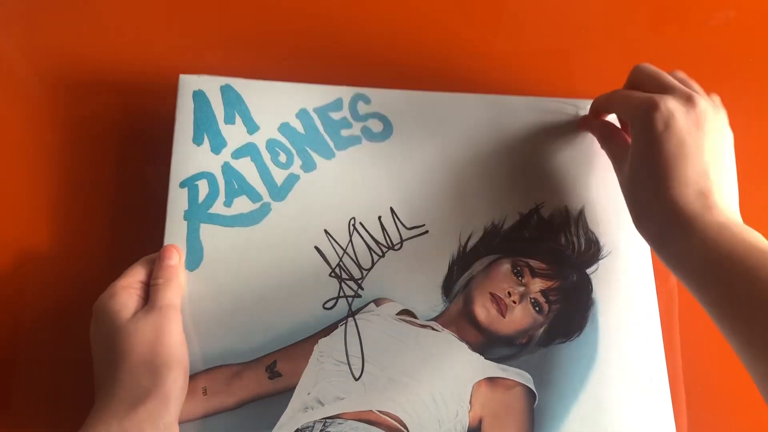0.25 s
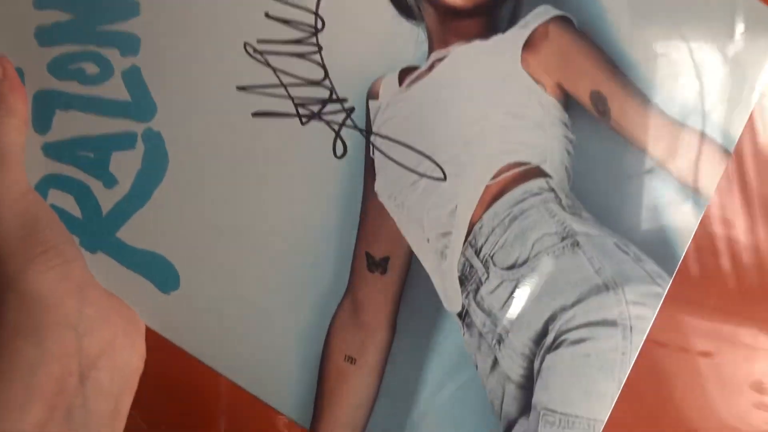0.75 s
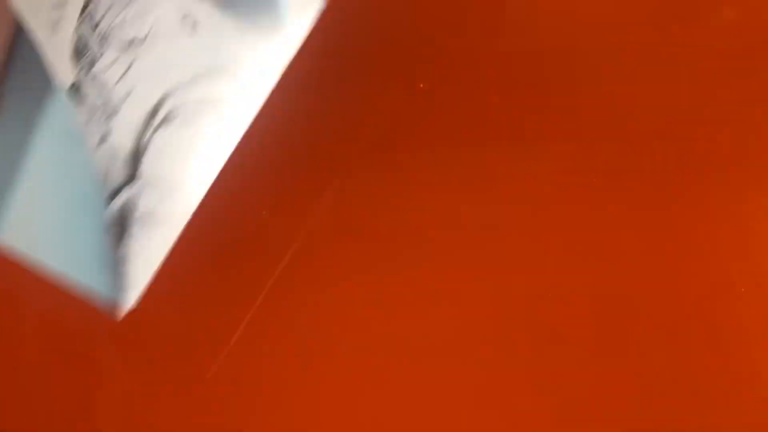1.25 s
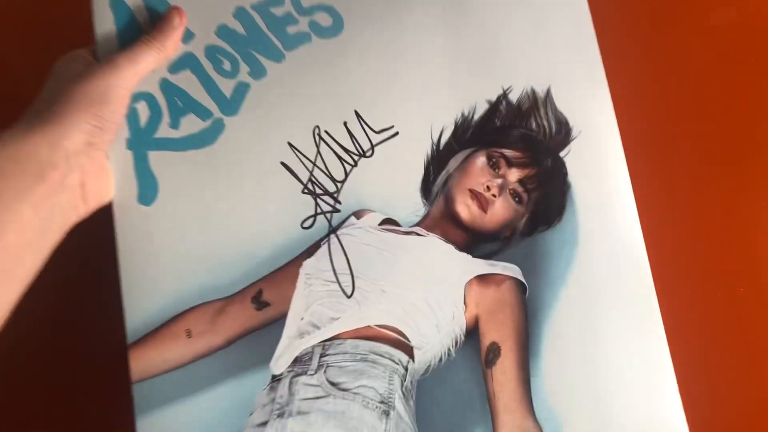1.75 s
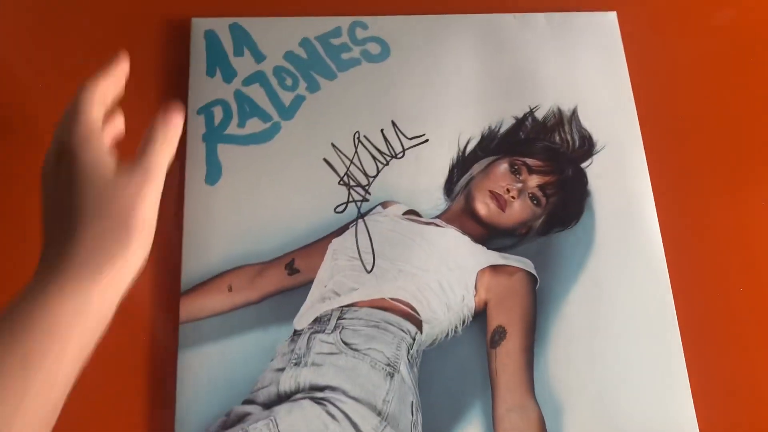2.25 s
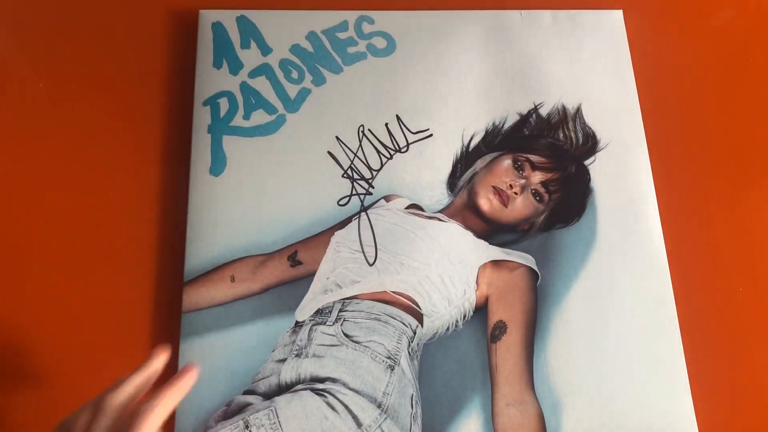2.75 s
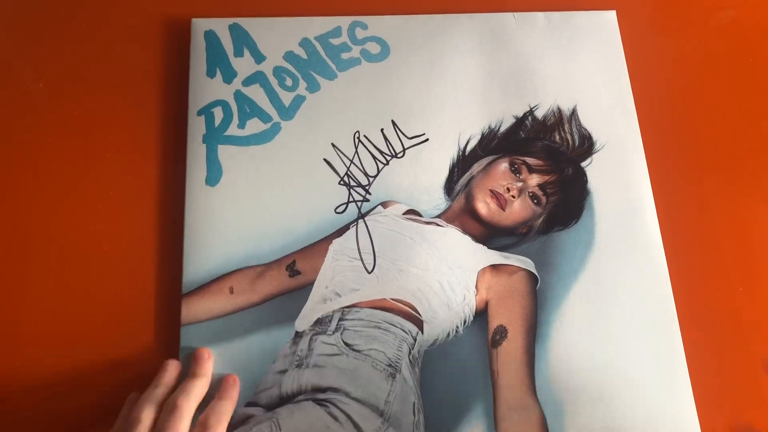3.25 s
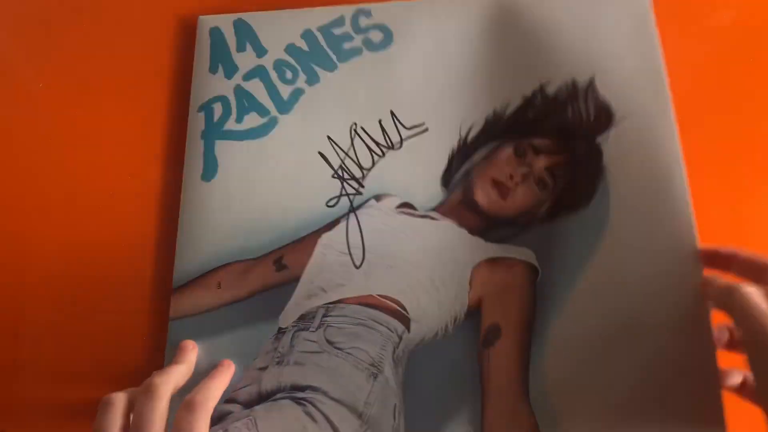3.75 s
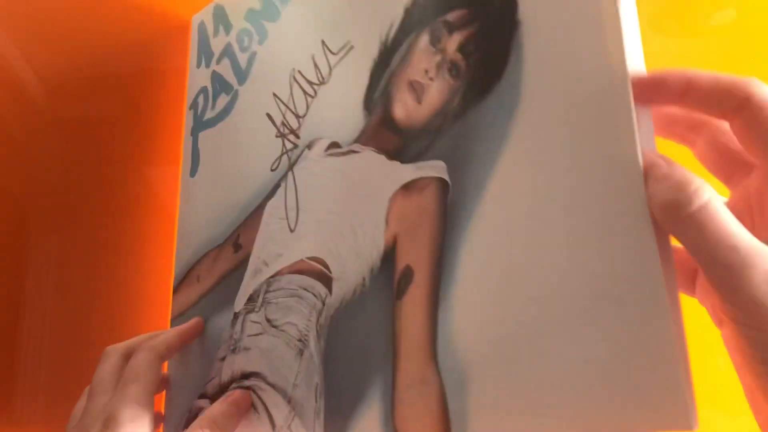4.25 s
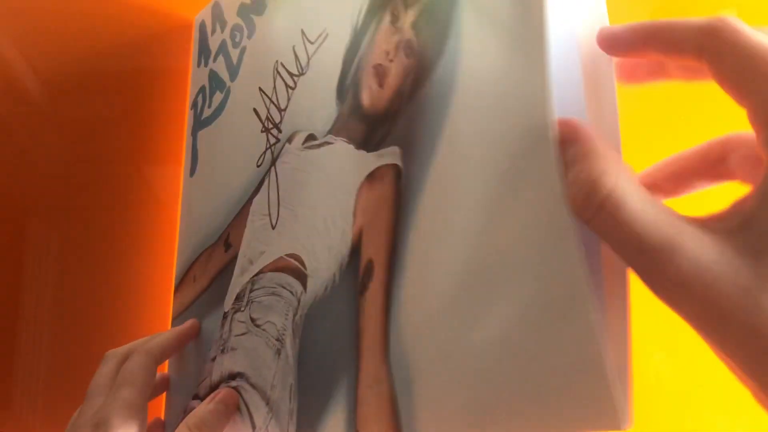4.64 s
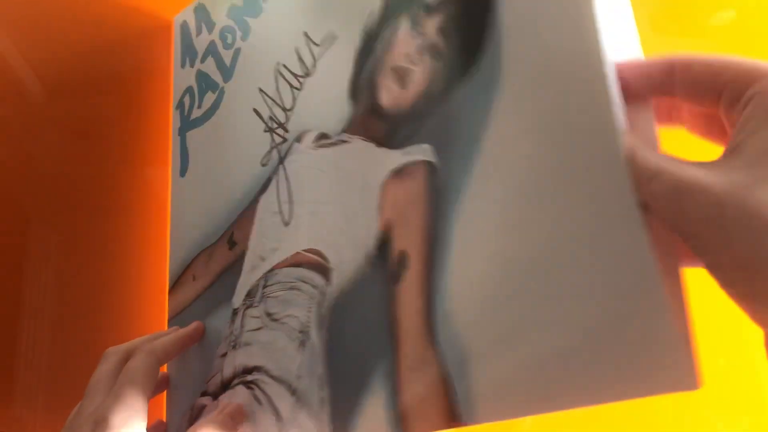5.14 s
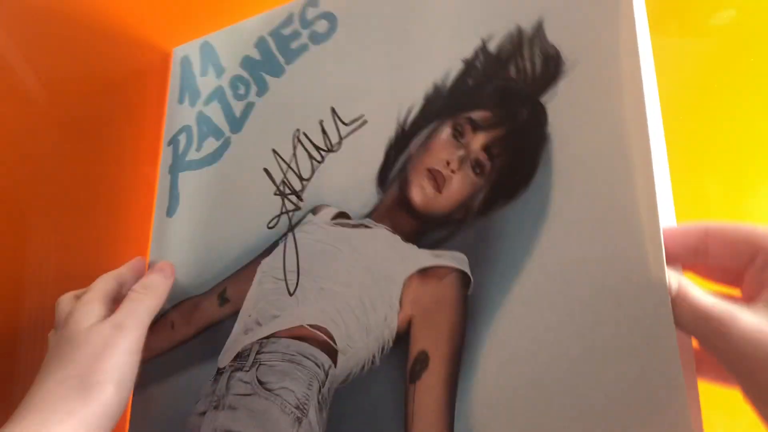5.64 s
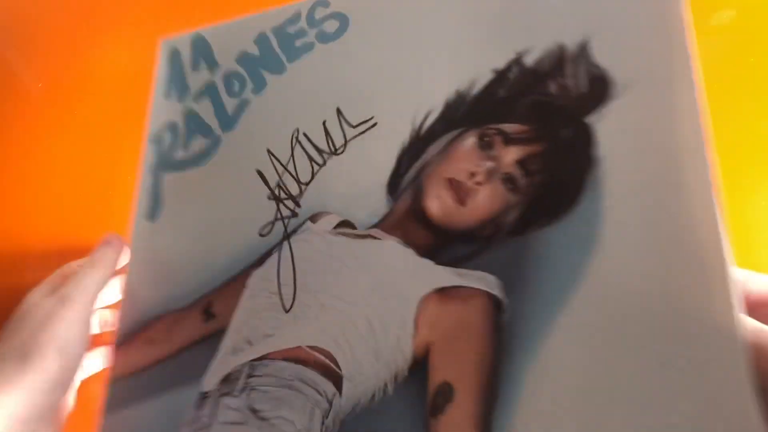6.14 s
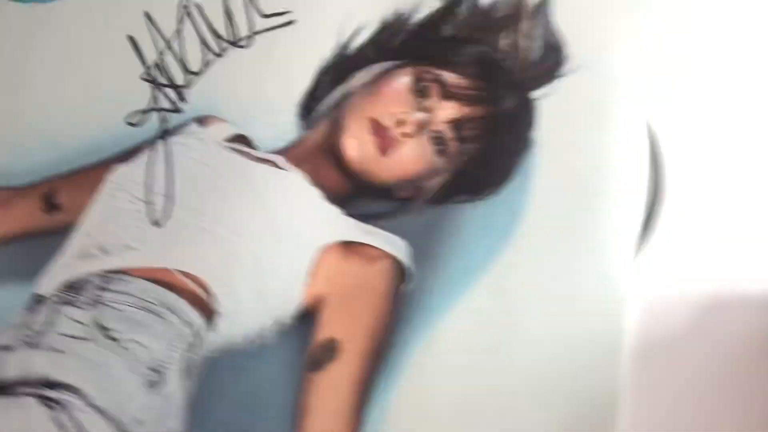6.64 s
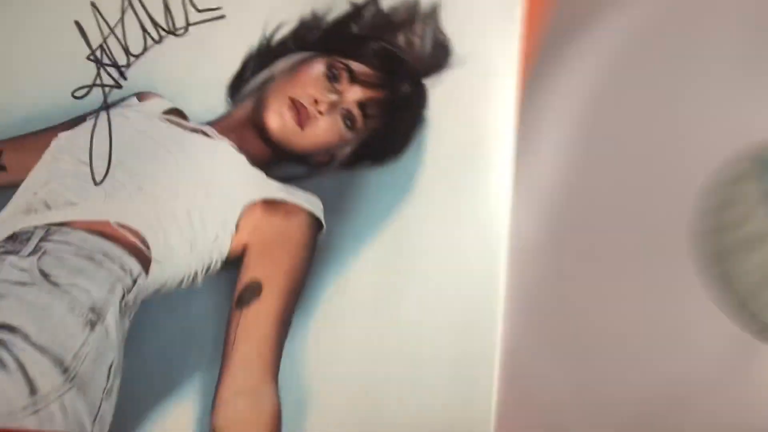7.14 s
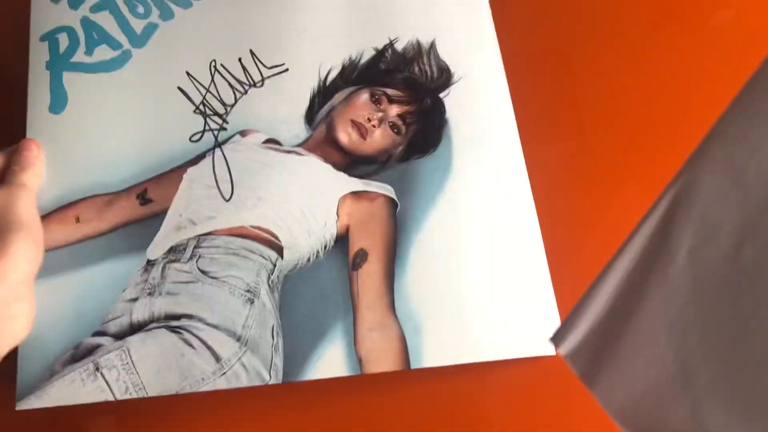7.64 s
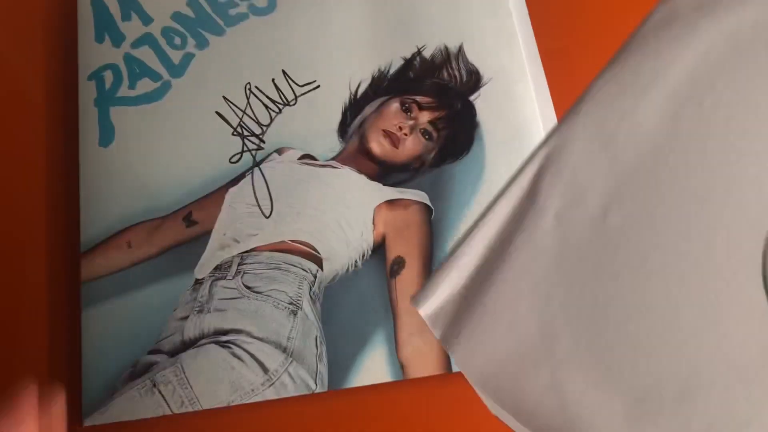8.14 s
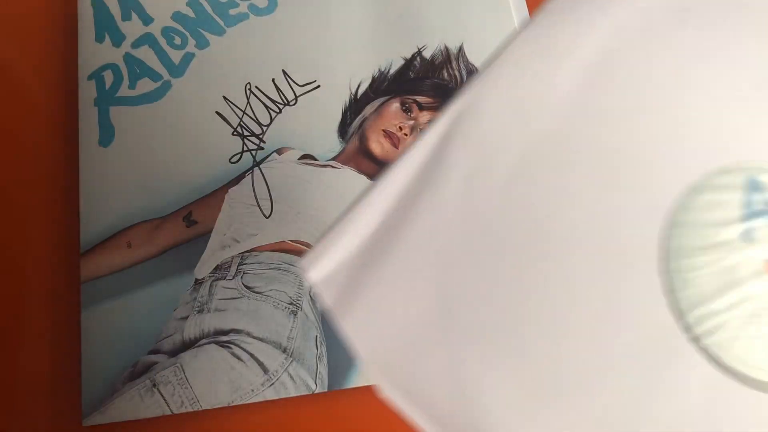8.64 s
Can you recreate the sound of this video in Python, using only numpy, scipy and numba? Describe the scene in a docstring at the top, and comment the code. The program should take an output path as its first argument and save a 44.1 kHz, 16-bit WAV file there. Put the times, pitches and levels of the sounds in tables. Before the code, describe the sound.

Hands peel thin plastic film from a card record sleeve with fine crackles and hiss, ending in one loud sharp snap. The card is laid down with light taps and soft table bumps, then pried open with dull rubs and creaks. A paper inner sleeve slides out in two breathy, rising swishes, followed by a few loose clicks. Close phone microphone, small quiet room.

```python
"""Unwrapping a card record sleeve

Hands strip plastic film from the sleeve on a wooden table, set it down, pry it open and draw the
paper inner sleeve out in two pulls. Rubbing is a dense spray of tiny slips; creases snap as short cracks;
card and table ring as dying modes; a small quiet room answers as fading noise, close under a phone."""
import sys
import numpy as np
from scipy import signal
from scipy.fft import rfft, irfft, next_fast_len
from scipy.io import wavfile
from scipy.ndimage import uniform_filter1d
from numba import njit

SR = 44100
rng = np.random.default_rng(int(sys.argv[2]) if len(sys.argv) > 2 else 0)


def wrap_up_sound(samples):
    """Save the sound to the file named by the first command line argument, as 16-bit audio."""
    columns = np.atleast_2d(samples).T
    # keep every value between -1 and 1, then stretch to whole-number steps
    tamed = np.clip(columns, -1, 1)
    steps = np.round(tamed * 32767).astype(np.int16)
    wavfile.write(sys.argv[1], SR, steps)


N = 392049

# still air and microphone hiss, relative spectrum: f/Hz, density/dB per Hz
AIR_SPECTRUM = [(15, -51), (25, -7), (127, -5), (190, -4), (223, -6), (405, -13), (1190, -21.5),
                (1840, -23.5), (16000, -37)]
# hand strokes over film and card: start/s, hold/s, rubbing level in 1-5 kHz before resonances/dB,
# slope/dB per octave (near 0 thin film, steep dull card), pitch of the bent sheet/Hz
HAND_STROKES = [(0.084, 0.067, -61, -3, 8100), (0.272, .59, -54, -1.5, 470),
                (0.876, 0.014, -41.5, -3.5, 1815), (.99, 0.26, -56.5, -3, 450),
                (1.438, 0.069, -60, -4, 1100), (1.561, 0.12, -63, -6.5, 576), (1.756, 0.061, -57, -5, 630),
                (1.892, 0.097, -56.5, -5.5, 810), (2.06, 0.13, -66, -1.5, 970),
                (2.222, 0.12, -64.5, -2, 1110), (2.38, 0.092, -64, -1.5, 1270),
                (2.854, 0.01, -61.5, -5.5, 935), (3.419, 0.15, -68, -5, 1043),
                (3.657, 0.13, -65.5, -6.5, 1350), (3.784, 0.028, -55.5, -8, 508),
                (4.08, 0.015, -55.5, -7, 1890), (4.171, 0.0097, -58, -7.5, 1800),
                (4.383, 0.0078, -67.5, -6, 1630), (4.59, 0.19, -65, -8, 1370), (4.849, 0.11, -62, -4, 2350),
                (4.949, 0.1, -59.5, -5, 1115), (5.137, 0.069, -59.5, -8.5, 1284),
                (5.3, 0.043, -58, -4.5, 446), (5.4, 0.038, -51.5, -9, 480), (5.612, 0.09, -51, -5.5, 512),
                (5.842, 0.062, -50.5, -7.5, 1150), (6.09, 0.095, -69, -10, 1540),
                (6.188, 0.094, -57, -7, 1045), (7.424, 0.06, -56.5, -4, 2890),
                (7.503, 0.0098, -48, -6.5, 785), (7.59, 0.12, -59, -8, 864), (7.7, .11, -66, -8, 832),
                (8.835, 0.047, -67, -1.5, 6850)]
# resonances of the card: f/Hz, relative level/dB, t60/s
CARD_MODES = [(381, 8, 0.045), (458, 4, 0.093), (515, 7.5, 0.038), (646, 0, 0.13), (810, -3.5, 0.056),
              (1394, -10, 0.48)]
# light ticks of film and paper that leave the card still: t/s, crack peak/dB, centre f/Hz
LIGHT_TICKS = [(0.1371, -28.5, 8750), (0.255, -44, 5000), (0.415, -35.5, 5740), (0.639, -37, 7500),
               (0.717, -37, 11000), (1.0187, -31, 6300), (1.0816, -36, 4100), (1.113, -32.5, 7600),
               (1.184, -35, 4140), (1.2075, -35.5, 3700), (1.597, -41, 2100), (1.659, -40, 2030),
               (1.767, -45, 2000), (2.077, -40, 6550), (2.2353, -33, 11060), (2.427, -39.5, 11000),
               (2.8598, -45, 1470), (2.88, -44, 780), (3.848, -42, 2680), (4.0932, -33, 2120),
               (4.196, -40.5, 2900), (4.339, -40.5, 1560), (5.41, -42, 1800), (5.479, -52, 1510),
               (5.649, -41, 1400), (5.661, -38, 1320), (5.856, -50, 1250), (5.968, -41, 1140),
               (6.1065, -40, 2780), (6.147, -44.5, 1570), (6.21, -41, 3300), (6.293, -42.5, 3000),
               (7.535, -34, 1200), (7.595, -38.5, 2400), (7.6367, -31.5, 2050), (7.6906, -37, 3380),
               (7.738, -40, 2030), (7.841, -46, 1492), (8.8508, -48, 792)]
# creases and edges that ring the card: t/s, crack peak/dB, centre f/Hz, card peak/dB, card f/Hz
CARD_SNAPS = [(0.284, -47, 880, -42.5, 473), (0.61, -45, 915, -45, 500), (0.88, -10, 2740, -23.5, 420),
              (1.584, -31, 3150, -32.5, 540), (1.788, -37.5, 1080, -44, 654),
              (1.8376, -27.5, 1980, -34.5, 900), (1.8654, -34, 2554, -41, 695),
              (3.817, -34, 1477, -40, 500), (4.06, -40.5, 1920, -46.5, 456), (4.107, -30, 1710, -33.5, 275),
              (4.5771, -22.5, 1410, -30, 447), (4.8353, -40, 1360, -44, 400),
              (5.201, -47, 1290, -46.5, 440), (5.327, -44.5, 1300, -44.5, 443),
              (5.416, -26, 1180, -30.5, 487), (5.6389, -33, 2620, -43, 526), (5.8646, -32, 1124, -46, 1110),
              (5.89, -33.5, 2020, -42, 467), (6.1883, -41.5, 1510, -46.5, 1020),
              (6.224, -30, 2190, -33, 1096), (7.4242, -46, 880, -44, 605), (7.5155, -24.5, 2000, -36, 900),
              (7.6184, -34, 1930, -37, 885), (7.7702, -38, 2530, -52, 840)]
# sleeve and hands meeting the table: t/s, peak/dB, pitch of the spot struck/Hz
TABLE_THUMPS = [(0.882, -43.5, 176), (1.917, -38.5, 142), (3.262, -42, 203), (4.103, -42.5, 117),
                (5.423, -45.5, 137), (5.891, -39.5, 118), (6.215, -42.5, 82), (6.416, -44.5, 91),
                (6.772, -48.5, 75.5), (7.538, -48, 150), (7.68, -43.5, 148)]
# resonances of the table top: f/Hz, relative level/dB, t60/s
TABLE_MODES = [(68, 0.5, 0.22), (104, -1, 0.26), (132.8, -1, 0.6), (186.4, 2, .25), (212.6, 3, 0.64)]
# inner sleeve pulled out: start/s, hold/s, level before the swell/dB, share of the sleeve drawn out
SLEEVE_PULLS = [(6.33, 0.11, -42, 0.29), (6.747, 0.19, -45.5, 0.59)]
# paper sliding on card, relative spectrum: f/Hz, density/dB per Hz
PAPER_SPECTRUM = [(88, -46), (150, -16.5), (431, -3.5), (637, -10), (1550, -6.5), (2140, -2.5), (4160, -4),
                  (16000, -13)]

TIME_S = np.arange(N) / SR
AIR_RMS_DB = -67
ATTACK_S, FILM_RELEASE_DB_PER_S, CARD_RELEASE_DB_PER_S = 0.019, 109.5, 171
BEND_GAIN, BEND_Q = 2.1, 7.
ROOM_DB, ROOM_T60_S = -26, 0.47
PULL_ATTACK_S, PULL_RELEASE_DB_PER_S = .11, 156
POCKET_SWELL_DB = 9.5  # gain of the hiss from sleeve fully in to fully out
POCKET_HZ = 1480  # with the sleeve fully in
BASS_CUT_HZ, TOP_CUT_HZ = 46, 15900


def undb(db):
    """Amplitude from dB."""
    return 10 ** (np.asarray(db) / 20)


def unit(x):
    """Scale to an RMS of 1."""
    return x / np.sqrt(np.mean(x ** 2))


def band(x, lo_hz, hi_hz):
    """Butterworth band-pass."""
    edges_hz = [lo_hz, min(hi_hz, .45 * SR)]
    return signal.sosfilt(signal.butter(2, edges_hz, "band", fs=SR, output="sos"), x)


def colour(x, spectrum):
    """Noise weighted by (Hz, dB) points on a log frequency axis, at unit RMS."""
    hz, db = np.transpose(spectrum)
    size = next_fast_len(N)
    bin_hz = np.arange(size // 2 + 1) * SR / size
    gain = undb(np.interp(np.log(bin_hz + 1), np.log(hz), db))
    return unit(irfft(rfft(x, size) * gain, size)[:N])


def fade(t, t60_s):
    """Exponential decay, 60 dB down at t60_s."""
    return np.exp(-np.log(1000) * t / t60_s)


def ring(modes, weights, count):
    """Weighted sum of dying sine modes."""
    t = np.arange(count) / SR
    return sum(w * undb(db) * fade(t, t60_s) * np.sin(2 * np.pi * hz * t)
               for w, (hz, db, t60_s) in zip(weights, modes))


def add(out, start_s, x):
    """Mix x into out from start_s."""
    i = int(start_s * SR)
    out[i:i + len(x)] += x[:N - i]


@njit
def svf(x, hz, q):
    """State-variable band-pass with a moving centre."""
    y, band_state, low_state = np.empty(len(x)), 0., 0.
    for i in range(len(x)):
        g = np.tan(np.pi * hz[i] / SR)
        v = (band_state + g * (x[i] - low_state)) / (1 + g * (g + 1 / q))
        band_state, low_state, y[i] = 2 * v - band_state, low_state + 2 * g * v, v / q
    return y


def slips(rate_hz, spread_db, tail_s, smooth):
    """Stick-slip: noise gated by many small releases of unequal size, over a smooth share."""
    sizes = undb(spread_db * np.minimum(rng.exponential(size=N), 3.5))
    starts = (rng.random(N) < rate_hz / SR) * sizes
    gate = signal.lfilter([1], [1, -np.exp(-1 / (tail_s * SR))], starts)
    return unit(rng.standard_normal(N) * (smooth + gate / gate.mean()))


def stroke(start_s, hold_s, attack_s, release_db_per_s):
    """Gain 0-1: smooth rise, hold, then a fall linear in dB."""
    t = TIME_S - start_s
    rise = np.sin(np.pi / 2 * np.clip(t / attack_s, 0, 1)) ** 2
    return rise * undb(-release_db_per_s * np.maximum(t - attack_s - hold_s, 0))


def air():
    """Still room air and microphone hiss: steady coloured noise."""
    return colour(rng.standard_normal(N), AIR_SPECTRUM) * undb(AIR_RMS_DB)


def hands():
    """Rubbing level, slope and sheet pitch: strokes add in power, slopes average by power."""
    power, tilt, pitch_hz = 1e-14, 0, 0
    for start_s, hold_s, db, slope_db, hz in HAND_STROKES:
        dull = np.clip(-slope_db / 8, 0, 1)
        # film dies away slower than card
        release_db_per_s = (1 - dull) * FILM_RELEASE_DB_PER_S + dull * CARD_RELEASE_DB_PER_S
        p = (undb(db) * stroke(start_s, hold_s, ATTACK_S, release_db_per_s)) ** 2
        pitch_hz = np.where(p > power, hz, pitch_hz)  # a stroke louder than those before it takes the pitch
        power, tilt = power + p, tilt + p * slope_db
    pitch_hz = np.maximum(uniform_filter1d(1. * pitch_hz, size=200), 100)
    return 10 * np.log10(power), tilt / power, pitch_hz


def rubbing():
    """Octave-sloped slips: film hisses and crackles finely, card catches and rings at its bend."""
    level_db, slope_db, bend_hz = hands()
    catch = np.clip(-slope_db / 6, .3, 1)
    size = next_fast_len(N)
    bin_hz = np.arange(size // 2 + 1) * SR / size
    place_oct = np.log2(bin_hz / 2200 + 1e-9)
    whole = slips(rate_hz=160.0, spread_db=2.0, tail_s=0.0015, smooth=1.0)
    crackle = slips(rate_hz=44.0, spread_db=4.5, tail_s=0.00088, smooth=0)
    film = rng.standard_normal(N) + 0.24 * crackle
    spray = 0
    for octave in range(-3, 4):
        # grains of one size colour one octave only, so the rustle is patchy
        own = .5 * whole + slips(rate_hz=45., spread_db=2.0, tail_s=0.0095, smooth=1.0)
        x = (1 - catch) * film + catch * own
        share = np.clip(1 - np.abs(place_oct - octave), 0, 1)  # neighbours add up to one
        part = irfft(rfft(x, size) * share, size)[:N]
        spray = spray + part * undb(slope_db * max(octave, -.8))
    spray = spray * undb(level_db) * np.sqrt(SR / 2 / 4000)  # the level counts 4 kHz of the spray
    # the bend never holds still
    wander = unit(uniform_filter1d(rng.standard_normal(N), size=1500))
    bend_hz = bend_hz * (1 + .03 * wander)
    bend = svf(svf(spray, bend_hz, BEND_Q), bend_hz, BEND_Q)
    card = ring(CARD_MODES, np.ones(len(CARD_MODES)), count=6000)
    card = card / np.sqrt(np.sum(card ** 2))
    body = signal.fftconvolve(spray, card)[:N]
    return spray + 0.08 * catch * body + BEND_GAIN * catch * bend


def snaps():
    """A short crack, the card modes nearest its pitch (none for ticks), a diffuse room answer."""
    out, t = np.zeros(N), np.arange(12000) / SR
    rows = CARD_SNAPS + [(s, db, hz, -np.inf, hz) for s, db, hz in LIGHT_TICKS]
    noise = rng.standard_normal((len(rows), 3, len(t)))
    swell = np.minimum(t / 0.0019, 1)
    for (start_s, db, hz, card_db, card_hz), (a, b, c) in zip(rows, noise):
        # the crease gives way with a tick and swings a few cycles at its pitch
        bright = min(hz / 5000 + 3 * undb(db), 1)  # low, weak creases give way softly
        give = hz * t / 1.4 * np.exp(1 - hz * t / 1.4)
        tick = band(a * fade(t, 0.0043), 1800.0, SR)
        crack = give * np.sin(2 * np.pi * hz * t) + 0.16 * bright * tick
        crack = crack + 2.6 / (.5 + bright) * band(a * fade(t, 15 / hz), hz / 1.8, hz * 1.88)
        # the first break is a bare click
        crack[:3] += 0.38 * bright * np.array([-1, 2, -1])
        share = [np.exp(-(np.log2(f / card_hz) / 0.19) ** 2) for f, _, _ in CARD_MODES]
        body = ring(CARD_MODES, share, count=len(t))
        body = body + 3.4 * band(b, card_hz / 1.8, card_hz * 1.6) * fade(t, 0.088)
        # the room returns each part as noise of its colour; the crease's own pitch lingers
        far = unit(band(c, hz / 5.4, hz * 2.15)) * (fade(t, ROOM_T60_S) + 5.0 * fade(t, 0.025))
        far = far + unit(band(b, hz / 1.143, hz * 1.32)) * fade(t, min(.3, 450 / hz))
        low = unit(band(c, card_hz / 1.024, card_hz * 1.3)) * fade(t, ROOM_T60_S)
        near = undb(db) * crack / np.abs(crack).max() + undb(card_db) * body / np.abs(body).max()
        room = undb(ROOM_DB) * swell * (undb(db) * far + 0.5 * undb(card_db) * low)
        add(out, start_s, near + room)
    return out


def thumps():
    """Soft, uneven pushes on the table top; modes nearest the struck spot's pitch answer most."""
    out, t = np.zeros(N), np.arange(4000) / SR
    noise = rng.standard_normal((len(TABLE_THUMPS), len(t)))
    settle = uniform_filter1d(noise, size=80, axis=1) * fade(t, 0.06)
    for (start_s, db, hz), wobble in zip(TABLE_THUMPS, settle):
        share = [np.exp(-(np.log2(f / hz) / 0.67) ** 2) for f, _, _ in TABLE_MODES]
        wobble = wobble - wobble[:600].mean() * fade(t, .1)
        push = np.exp(-((t - .002) / 0.00015) ** 2) + 1.5 * wobble
        x = signal.fftconvolve(ring(TABLE_MODES, share, count=20000), push)
        add(out, start_s, undb(db) * x / np.abs(x).max())
    return out


def pull():
    """Paper slides over card; the air pocket between them rings higher as it shrinks."""
    speeds = [stroke(start_s, hold_s, PULL_ATTACK_S, PULL_RELEASE_DB_PER_S)
              for start_s, hold_s, _, _ in SLEEVE_PULLS]
    drawn = sum(row[3] * np.cumsum(v) / v.sum() for row, v in zip(SLEEVE_PULLS, speeds))
    level = sum(undb(row[2]) * v for row, v in zip(SLEEVE_PULLS, speeds))
    slide = colour(slips(rate_hz=810.0, spread_db=8.0, tail_s=0.0037, smooth=4.3), PAPER_SPECTRUM)
    pocket = svf(slide, POCKET_HZ / np.maximum(1 - drawn, .1), 1.7)
    return unit(slide + 0.81 * pocket) * undb(POCKET_SWELL_DB * drawn) * level


def scene():
    """All layers summed, one channel."""
    return (air() + rubbing() + snaps() + thumps() + pull())[None]


def record(dry):
    """The phone drops the deepest bass and cuts the top steeply."""
    x = signal.sosfilt(signal.butter(4, BASS_CUT_HZ, "high", fs=SR, output="sos"), dry)
    return signal.sosfilt(signal.ellip(10, .2, 60, TOP_CUT_HZ, fs=SR, output="sos"), x)


dry = scene()
out = record(dry)
wrap_up_sound(out)
```